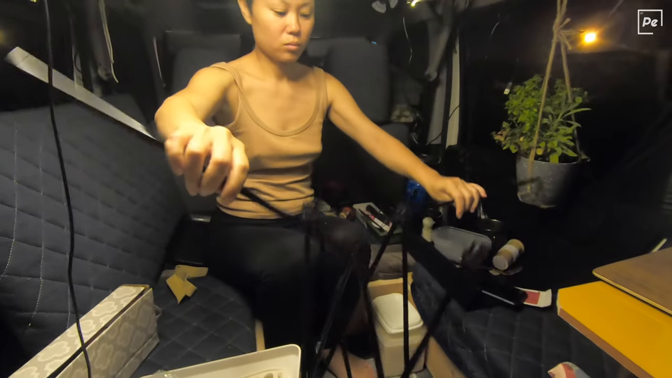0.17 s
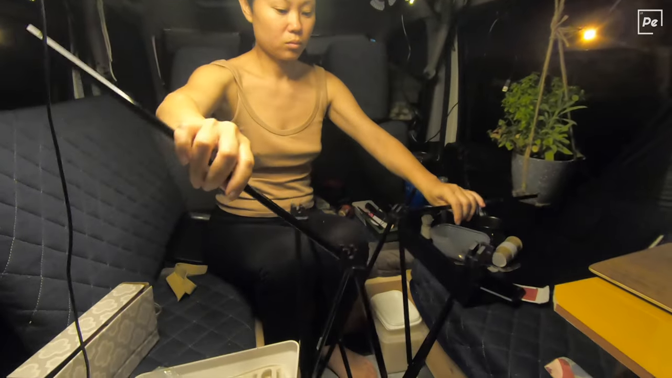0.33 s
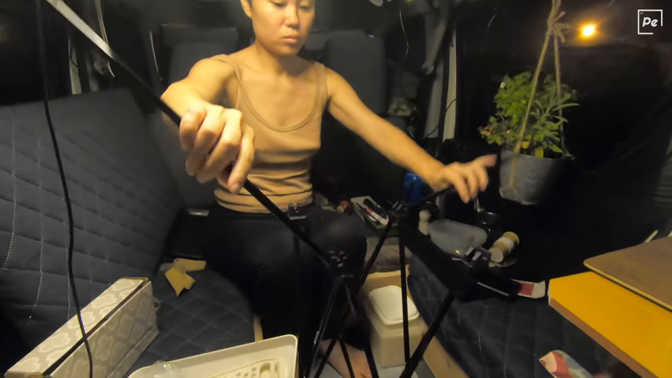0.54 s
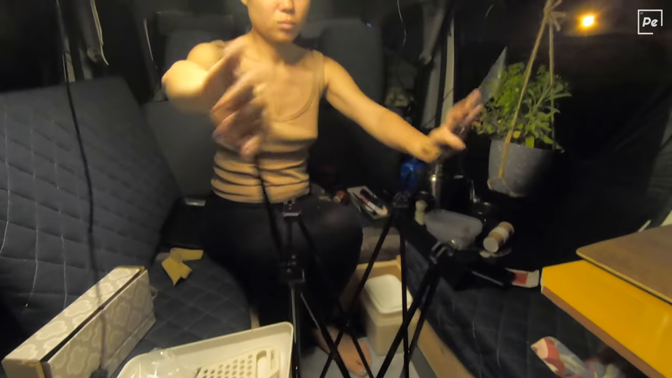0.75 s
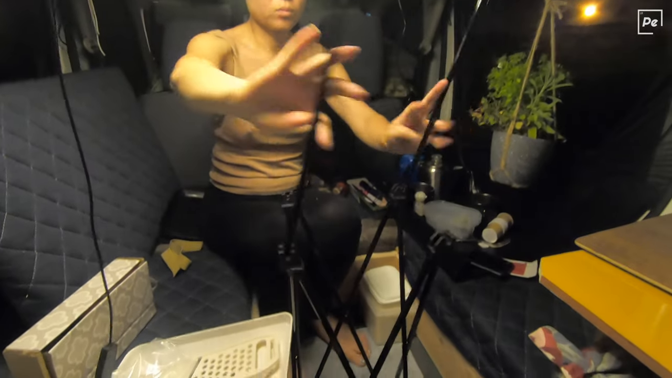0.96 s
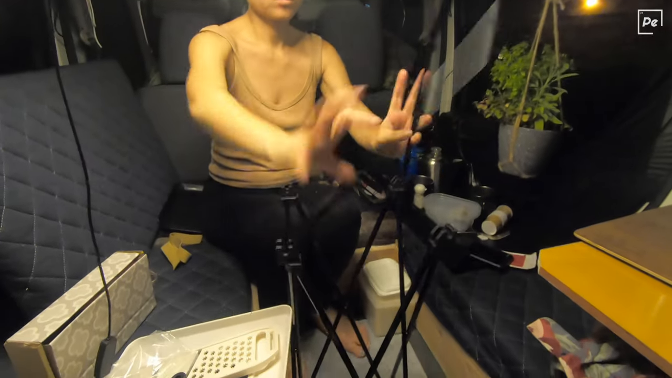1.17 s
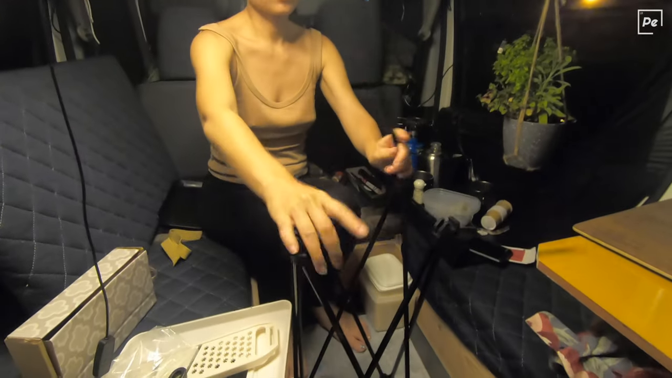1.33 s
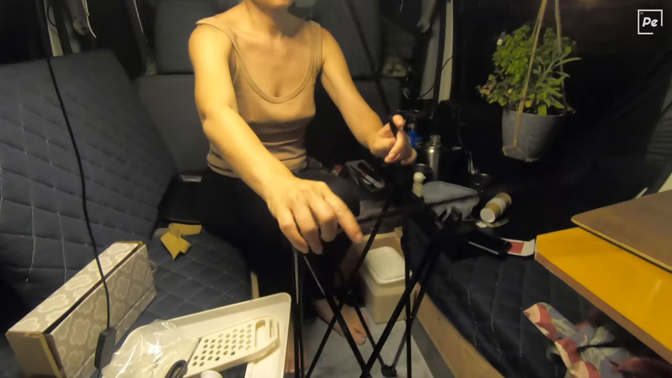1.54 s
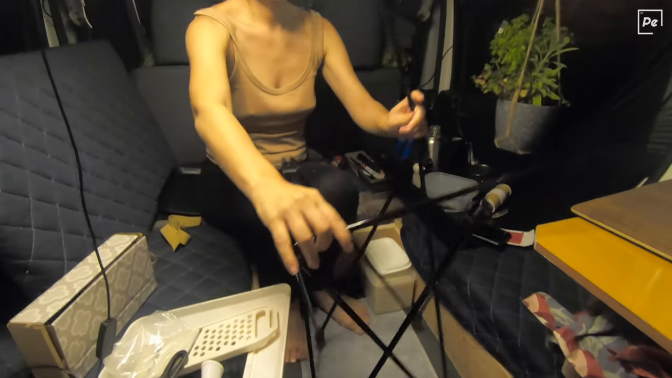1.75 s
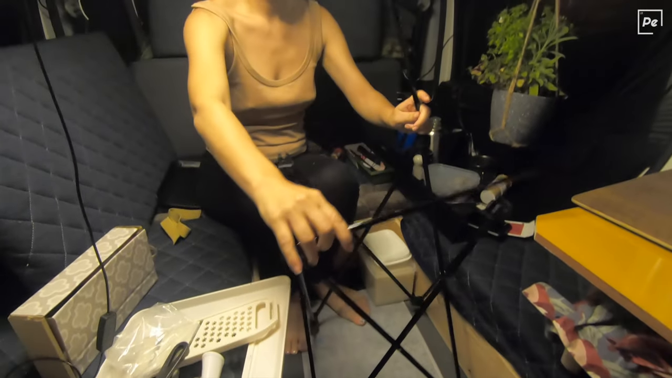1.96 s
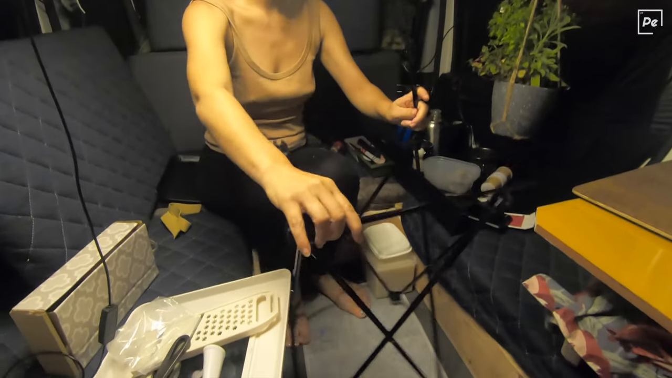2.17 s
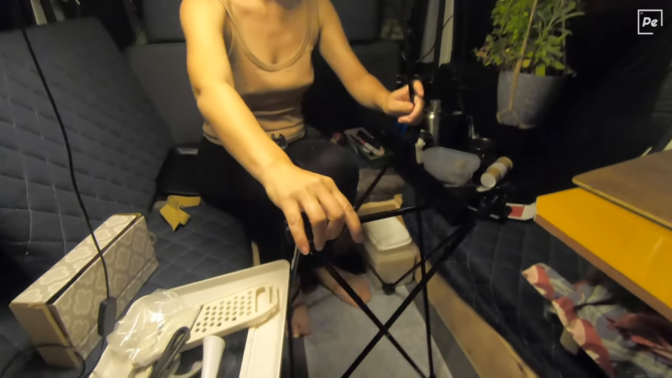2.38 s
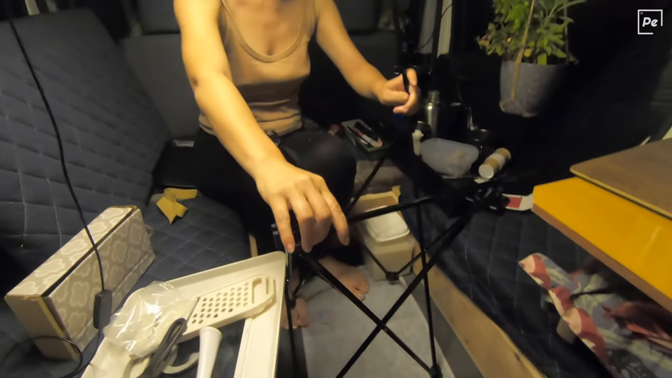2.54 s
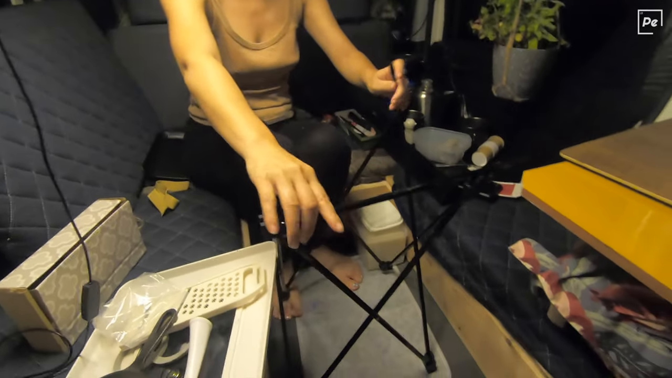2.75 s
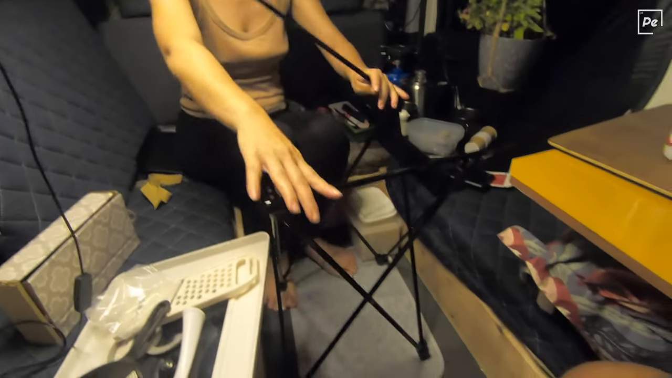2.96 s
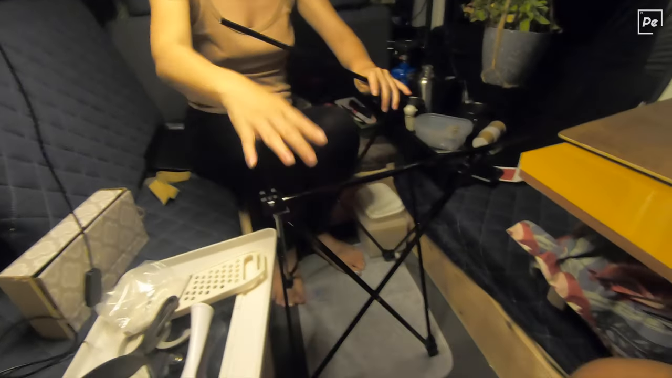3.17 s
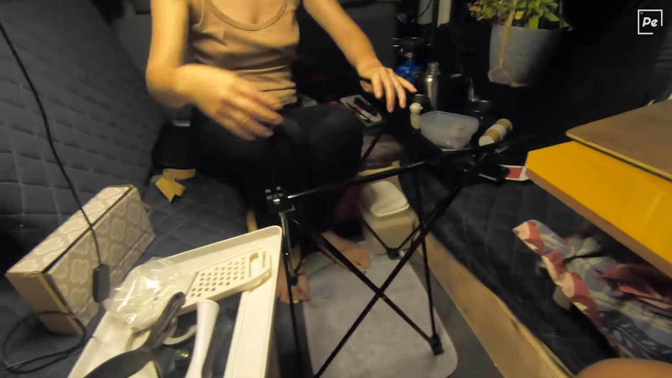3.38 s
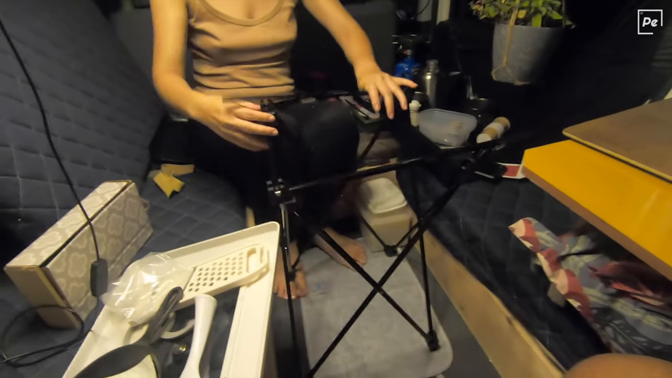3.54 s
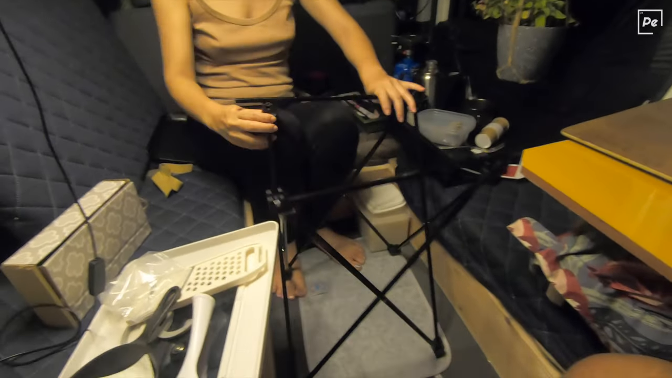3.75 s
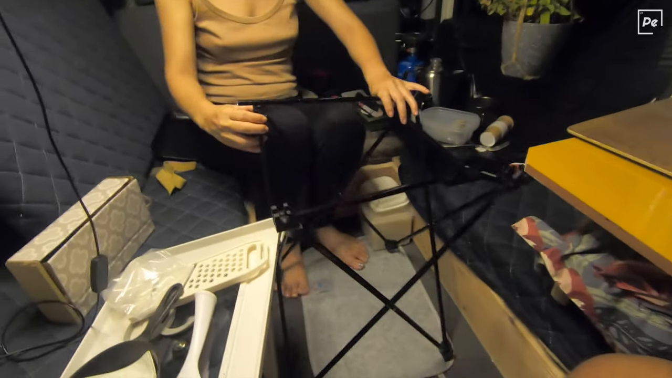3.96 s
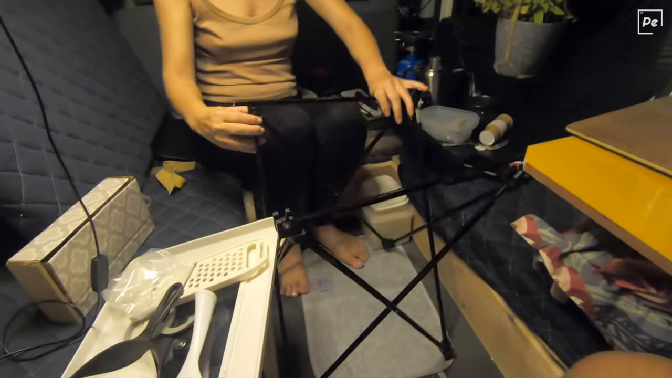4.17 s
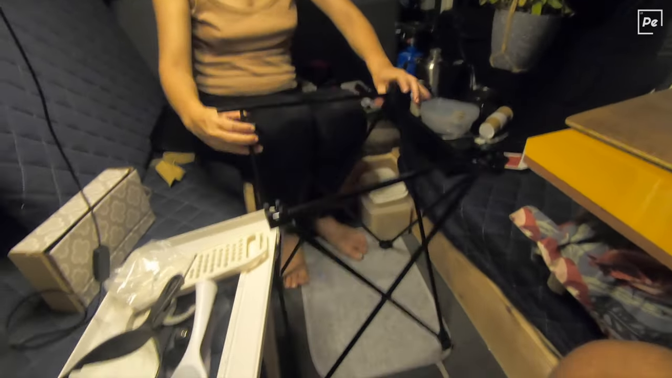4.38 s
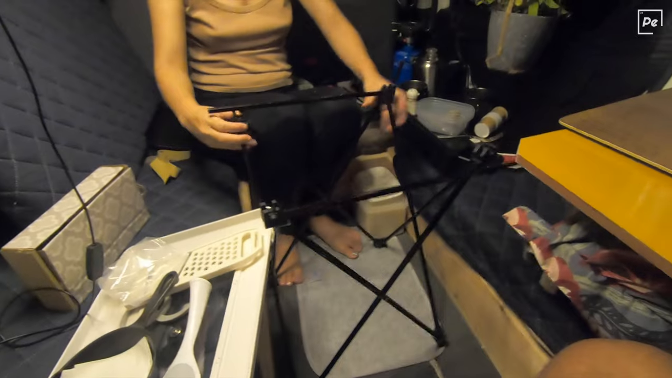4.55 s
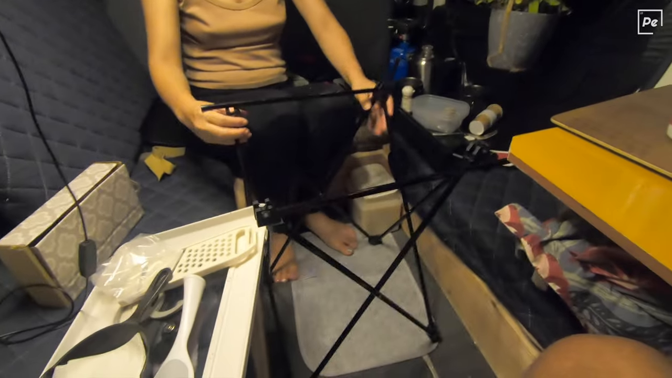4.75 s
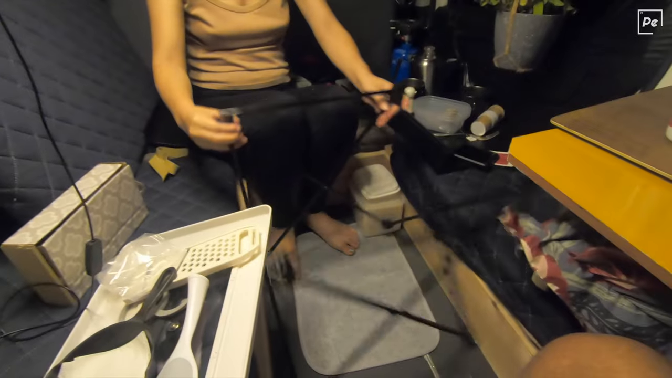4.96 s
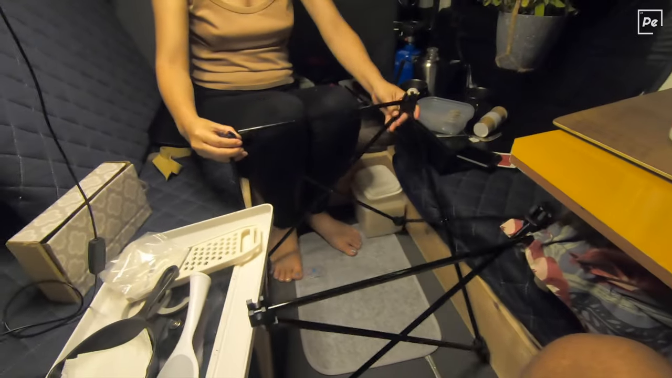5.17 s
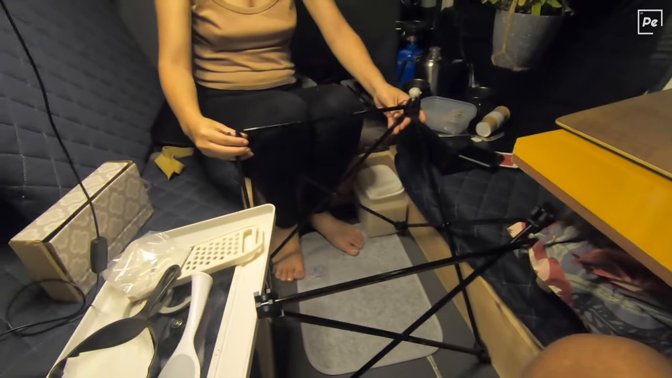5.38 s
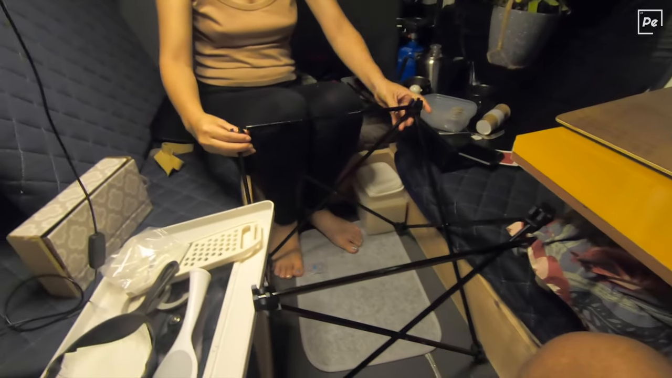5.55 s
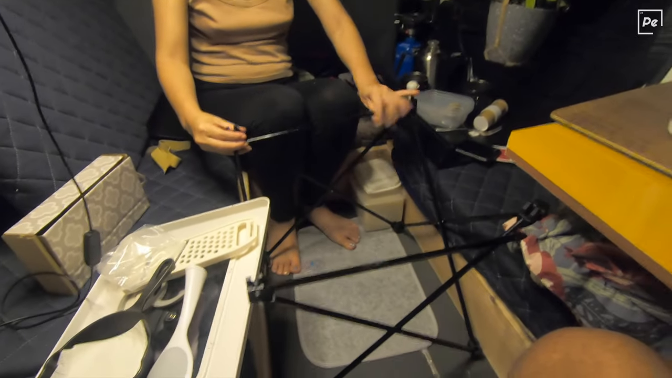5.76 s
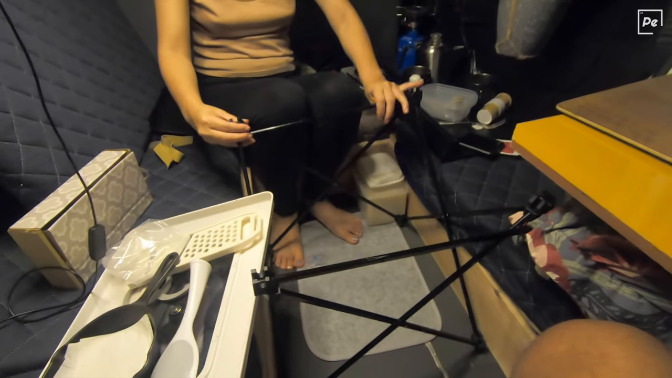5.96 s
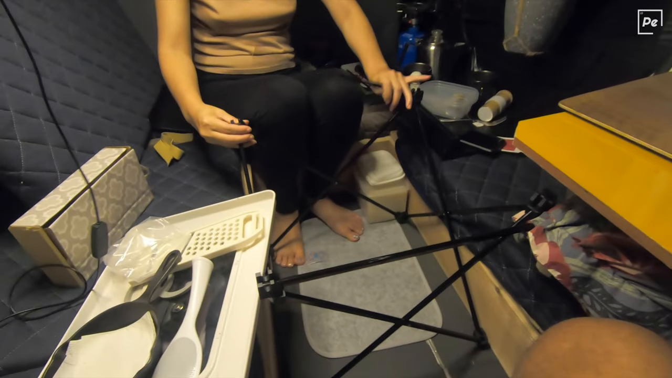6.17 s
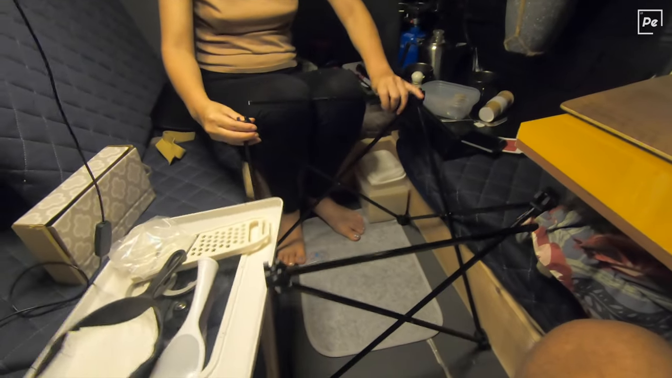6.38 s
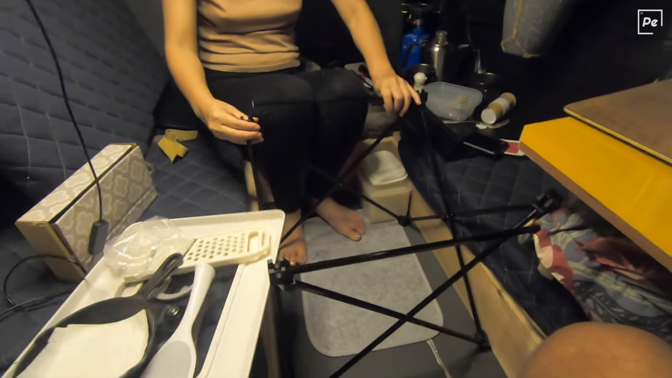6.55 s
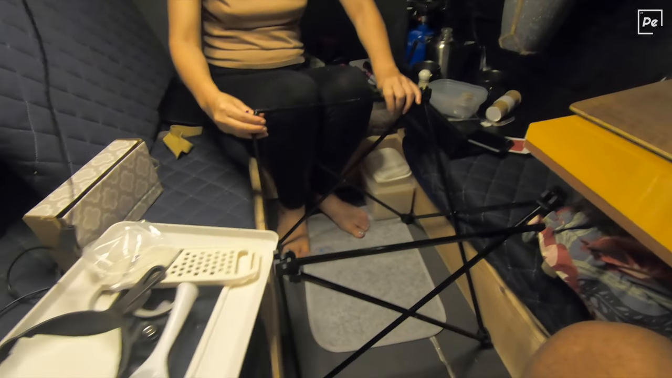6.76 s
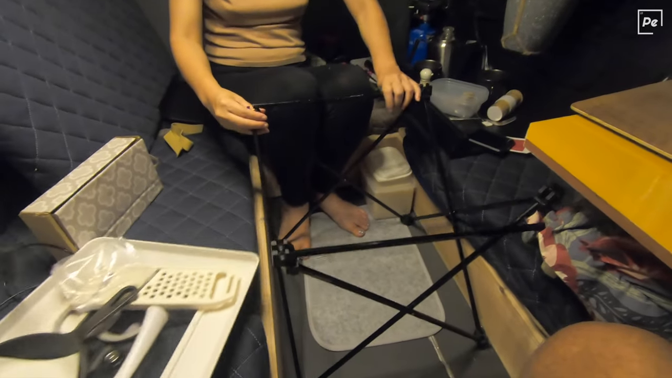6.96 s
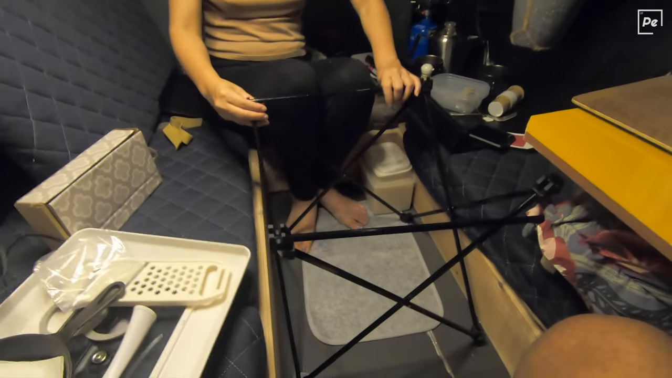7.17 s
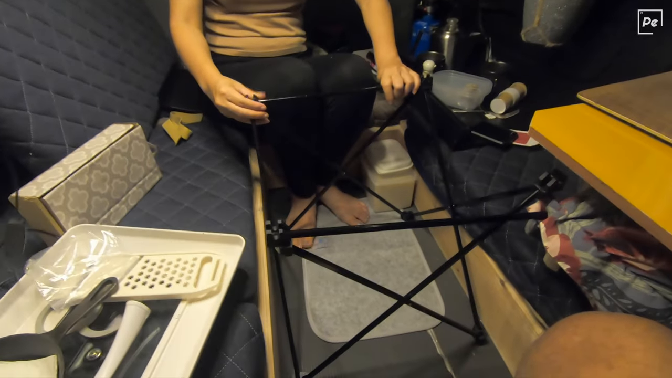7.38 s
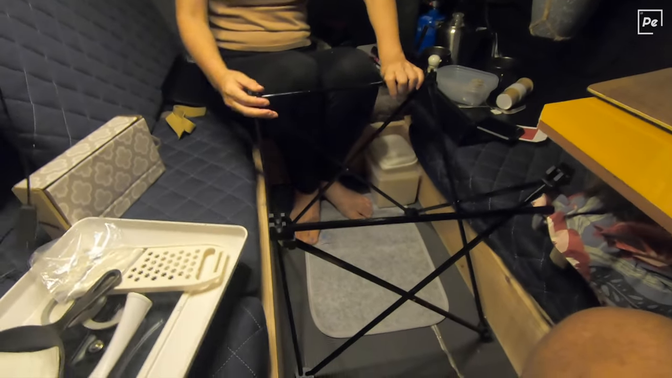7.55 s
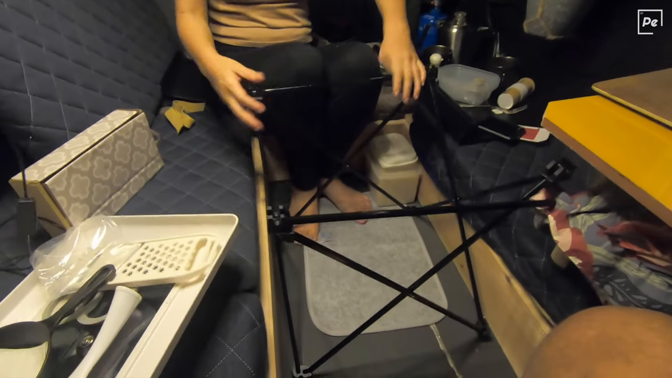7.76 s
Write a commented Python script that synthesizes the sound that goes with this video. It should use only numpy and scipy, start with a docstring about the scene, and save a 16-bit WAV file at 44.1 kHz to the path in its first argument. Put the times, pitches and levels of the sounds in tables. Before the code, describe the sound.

Metal tubes scrape and clack as a collapsible frame unfolds close by, one blow ringing briefly, with floor thumps and faint low rumble.

```python
"""A short scrape of metal runs into hard clacks over a faint hiss and rumble: a folding table frame of
thin tubes is opened inside a small padded van, near a two-port microphone.
Scrapes and chatter are shaped noise; knocked tubes ring as sine pings and resonances.
Feet and knees thump the floor, and one blow clanks a sheet panel.
Short noise reflections are the cabin's answer to the metal frame."""
import sys
import numpy as np
from scipy import signal
from scipy.fft import rfft, irfft
from scipy.io import wavfile
from scipy.ndimage import uniform_filter1d

SR = 44100
rng = np.random.default_rng(int(sys.argv[2]) if len(sys.argv) > 2 else 0)


def wav_record(signal):
    """Record a signal, one row per channel, as 16-bit PCM in the file named by sys.argv[1]."""
    frames = np.transpose(np.atleast_2d(signal))
    bounded = np.clip(frames, -1, 1)
    # unit amplitude maps onto the largest positive 16-bit level
    quanta = np.round(bounded * 32767).astype(np.int16)
    wavfile.write(sys.argv[1], SR, quanta)


N = 344862  # length in samples


def undb(db):
    """Turn decibels into a gain."""
    return 10 ** (np.asarray(db) / 20)


def unit(x):
    """Scale a sound to an average (rms) level of 1."""
    return x / np.sqrt(np.mean(x ** 2))


def band(x, lo_hz, hi_hz, order=2):
    """Keep only the pitches between two edges (Butterworth band-pass)."""
    return signal.sosfilt(signal.butter(order, [lo_hz, hi_hz], "band", fs=SR, output="sos"), x)


def mode(x, hz, t60):
    """Ring at one pitch: a unit click gives a tone of amplitude 1 that falls 60 dB in t60 seconds."""
    r = np.exp(-np.log(1000) / (t60 * SR))
    w = 2 * np.pi * hz / SR
    return signal.lfilter([0, r * np.sin(w)], [1, -2 * r * np.cos(w), r * r], x)


def walk(rate):
    """Wander at random, with `rate` new levels per second, smoothed; the spread is near 1."""
    k = max(int(SR / rate), 1)
    held = np.repeat(rng.standard_normal(N // k + 1), k)
    return 1.2 * uniform_filter1d(held, k)[:N]


def add(out, s, piece):
    """Mix a piece in at time s (seconds)."""
    i = int(s * SR)
    out[..., i:i + piece.shape[-1]] += piece[..., :N - i]


def sides(pan_db):
    """Give the gains at the left and right port for a left-minus-right difference in dB."""
    return undb(np.array([[pan_db], [-pan_db]]) / 2)


# The colour of the hiss. Each row: frequency in Hz, relative level in dB per Hz.
HISS_COLOUR = [(41, -40), (70, -20), (112, -18), (146, -4.5), (286, -5.5), (417, -12.5), (1460, -22.5),
               (2130, -26), (3550, -32), (5680, -27), (14500, -47.5)]
HISS_DB = -73.5


def hiss():
    """Faint air and street noise, alike left and right in the bass, drifting a little."""
    hz = np.maximum(np.arange(N // 2 + 1) * SR / N, 1)
    points_hz, points_db = np.transpose(HISS_COLOUR)
    colour = undb(np.interp(np.log(hz), np.log(points_hz), points_db))
    mid, side = rfft(rng.standard_normal((2, N)))
    apart = np.clip(hz / 900, .15, .9)
    noise = irfft(colour * np.array([mid + apart * side, mid - apart * side]), N)
    level = undb(HISS_DB + 3.0 * walk(3))
    return level * noise / np.sqrt(np.mean(noise.mean(0) ** 2))


# How strongly the van body sways. Each row: time in seconds, middle level in dB.
SWAY = [(0, -62.5), (.2, -52.5), (.6, -63.5), (.9, -59), (1.301, -67), (1.452, -42), (1.699, -66),
        (3.502, -65.5), (4.299, -59), (5.101, -77.5), (5.501, -76), (7.15, -67.5), (7.3, -62.5),
        (7.8, -88.5)]


def rumble():
    """The van body wobbles: very low noise whose level follows a curve and wanders around it."""
    mid, side = band(rng.standard_normal((2, N)), 21, 42, order=3)
    s, db = np.transpose(SWAY)
    level = undb(np.interp(np.arange(N) / SR, s, db) + 8.6 * walk(6))
    return level * (unit(mid) + 0.55 * unit(side) * np.array([[1], [-1]]))


def contacts(uneven_db, rate, apart, lag_s):
    """Metal touching metal: uneven noise, part shared but late at the right port, part each port's own."""
    shared = rng.standard_normal(N)
    late = np.roll(shared, int(lag_s * SR))
    ports = np.array([shared, late]) + apart * rng.standard_normal((2, N))
    return unit(undb(uneven_db * walk(rate)) * ports)


def patchy(x, depth_db, rate):
    """As the tubes move, narrow resonant patches of the noise swell and sink on their own."""
    hz = 500 * 2 ** (np.arange(40) / 8)  # eight patches per octave
    return unit(sum(undb(depth_db * walk(rate)) * band(x, f / 1.035, f * 1.035, order=1) for f in hz))


# Short slides of a tube through a joint. Each row: loudest moment in seconds, relative level in dB,
# rise in seconds, fall in seconds, low band against that level in dB, treble against that level in dB.
SLIDES = [(0.021, -44.5, 0.13, 0.066, -9.5, -1), (0.66, -68.5, 0.17, 0.064, -2, -4.5),
          (0.72, -47.5, 0.061, 0.035, -6.5, -20.5), (0.849, -64, 0.089, 0.054, -3.5, -8),
          (1.72, -74, 0.058, 0.081, 3.5, 1), (2.447, -69.5, 0.14, 0.15, 0.5, -10.5),
          (3.801, -60.5, 0.043, 0.092, 12, -24.5), (4.288, -49, 0.054, 0.041, -4.5, -17),
          (4.44, -64.5, 0.15, 0.026, 0.5, -6), (4.892, -50, 0.063, 0.085, -6, -10),
          (5.075, -29, 0.027, 0.033, -7.5, -15.5), (5.2, -64.5, 0.026, 0.092, 2, -10),
          (6.14, -56.5, 0.072, 0.04, -3, -10), (6.588, -50, 0.074, 0.026, -4, -20)]
SLIDE_FADE_DB = 24.5  # drop one rise time before the loudest moment, or one fall time after it
# The last tube, drawn slowly through the fingers. Each row: time in seconds, relative level in dB.
DRAW = [(6.3, -52), (6.38, -49), (6.43, -57.5), (6.54, -53), (6.6, -53), (6.62, -59), (6.85, -58.5),
        (7.07, -56), (7.14, -67), (7.22, -67), (7.29, -63.5), (7.38, -62.5), (7.441, -82), (7.6, -64.5),
        (7.82, -59.5)]
DRAW_BODY_DB, DRAW_TREBLE_DB = -2, -12  # low band and treble against the level, when it is -55 dB
DULLER_DB_PER_DB = 0.34  # pressed harder, the rasp gains body and loses treble


def slide_force(low, high, fidget):
    """How hard rubbing drives one band: short slides swell and fade, the draw follows its curve, hands fidget."""
    t = np.arange(0, N, 32) / SR
    s, db = np.transpose(DRAW)
    duller_db = DULLER_DB_PER_DB * (db + 55)
    draw_db = db + low * (DRAW_BODY_DB + duller_db) + high * (DRAW_TREBLE_DB - duller_db)
    force = undb(np.interp(t, s, draw_db, left=-200))
    for s, db, rise_s, fall_s, body_db, treble_db in SLIDES:
        away = np.maximum((s - t) / rise_s, (t - s) / fall_s)
        force = force + undb(db + low * body_db + high * treble_db - SLIDE_FADE_DB * away ** 2)
    return np.interp(np.arange(N) / SR, t, force) + fidget * undb(-6 * high)


# Joints and tubes knocking. Each row: start in seconds, relative level in dB, low band against that level
# in dB, treble against that level in dB, basic chatter time to fall 60 dB in seconds,
# pitch of the struck part in Hz, left minus right in dB.
CLACKS = [(0.0974, -18, -6, -9.5, 0.11, 2960, 1), (0.182, -19.5, -4, -7, 0.1, 2700, -0.2),
          (0.248, -31.5, -0.5, -16, 0.079, 2490, 1), (0.277, -32, -0.5, -17.5, 0.041, 2440, 0.5),
          (0.378, -39, -1, -18.5, 0.066, 1694, 0.5), (1.074, -31, -4, -7, 0.062, 3160, 0.5),
          (1.27, -53, -3, -1.5, 0.84, 6150, -1.5), (1.316, -17, -3, -10, 0.014, 2564, -2.5),
          (1.8262, -38, -5.5, 2.5, 0.022, 1580, -1), (2.114, -53, -10, -4.5, 0.04, 2700, 0),
          (2.169, -41.5, -4, -3.5, 0.026, 2960, -1.5), (2.2004, -24.5, -5, -4.5, 0.039, 2510, 0),
          (2.2597, -32, -9, 2.5, 0.017, 2460, 0.5), (2.3186, -37.5, -4, -13, 0.078, 2690, 0.5),
          (2.7148, -59, 15.5, -22.5, 0.073, 1610, 0.5), (2.7682, -50.5, 4, -1.5, 0.041, 1610, 4.5),
          (3.5401, -39.5, -4.5, -5, 0.027, 1830, -1.5), (3.6264, -56, -0.5, 5.5, 0.086, 5800, 0),
          (3.675, -56.5, -2, 11.5, 0.02, 7760, 1), (3.769, -42, 2.5, -32, 0.12, 1330, -2.5),
          (3.8643, -22, -2.5, -9.5, 0.079, 2590, 0.5), (4.2627, -44.5, -2, -17, 0.08, 1586, 2),
          (4.404, -36.5, -11, -11, 0.017, 2800, 5), (4.414, -47.5, 8, -12, 0.011, 2330, -9),
          (4.4731, -42.5, -5, -5, 0.013, 1570, 2), (4.8488, -39.5, 1, -24, 0.043, 1710, -2),
          (4.907, -28, 0.5, -6, 0.028, 920, -0.5), (4.934, -38.5, -14, 7.5, 0.097, 5100, 0),
          (4.9883, -24.5, 9, 0, 0.018, 940, -1), (5.028, -34.5, -25.5, 8, 0.081, 2880.0, -2),
          (5.0446, -21.5, -2, -4, 0.071, 3680, 0), (5.1352, -32.5, -2.5, -30, 0.054, 1510, 0.5),
          (5.489, -46.5, -12, 1, 0.023, 3370, -1), (5.6122, -33, -12, 15, 0.03, 7700, 1.5),
          (5.694, -47.5, -6, 15.5, 0.029, 8050, 1.5), (5.7224, -47.5, -7.5, 14, 0.027, 7730, -2),
          (5.744, -42.5, -8, 0, 0.023, 3800, 1), (5.7856, -49.5, -16, 7, 0.029, 7800, 0),
          (5.9813, -61, 5, -23, 0.1, 1496, 0.5), (6.083, -53.5, 3.5, -22, 0.028, 920, -2),
          (6.2913, -26.5, -7, -12, 0.044, 1110, 0.5), (6.8591, -37.5, -15, -5, 0.026, 2140, 0),
          (6.8761, -36, -10, -5, 0.078, 3370, -0.5), (7.2462, -50, -3, -9, 0.25, 2170, 1),
          (7.5913, -49, -18.5, -23, 0.065, 1940, 0.3), (7.7098, -43, -4, -6.5, 0.061, 4520, 2),
          (7.7846, -44, 2, -38.5, 0.079, 2164, 0.5), (7.805, -40.5, -2.5, -17.5, 0.093, 1457, 8)]


def clack_force(low, high, share):
    """How hard knocks drive one band: a quick rise, a hold that is longer for harder knocks, and a decay."""
    force, t = np.zeros((2, N)), np.arange(SR // 8) / SR
    rise = 1 - np.exp(-t / 0.0012)
    for s, peak_db, body_db, treble_db, t60, _, pan_db in CLACKS:
        hold_s = 0.0081 * undb((peak_db + 16.5) / 2)
        fade = np.exp(-np.log(1000) * np.maximum(t - hold_s, 0) / (t60 * share))
        level = undb(peak_db + low * body_db + high * treble_db)
        add(force, s, level * sides(pan_db) * (rise * fade))
    return force


# Bands of contact noise. Each row: low edge in Hz, high edge in Hz, gain in dB,
# multiplier of the basic chatter time.
BANDS = [(717, 1680, -3, 1.22), (1750, 2900, -1.5, 0.8), (2970, 4650, -3, 1.29), (4740, 8120, 1.5, 1.1),
         (9810, 12000, -11.5, 0.6)]
# How far each band follows the tables' tone columns. Each row: share of the low-band dB, share of the treble dB.
FOLLOW = [(1, 0), (0, 0), (0, .35), (0, 1), (0, 1)]
# Ringing of the tube frame. Each row: pitch in Hz, relative level in dB, time to fall 60 dB in seconds.
FRAME_MODES = [(845, -15, 0.05), (1060, -11, .05), (1262, -10, .06), (1570, -11, .05), (2670, -11, .1)]
FIDGET_DB = -81  # relative level of hands shifting on the tubes throughout
PORT_LAG_S = .00022  # the sliding tubes are nearer the left port


def frame():
    """Chatter and rasp, heard directly and through the ringing tubes, which rubbing wakes more."""
    chatter = patchy(contacts(uneven_db=2.8, rate=320, apart=0.8, lag_s=.00003), depth_db=4, rate=25)
    rasp = patchy(contacts(uneven_db=2.0, rate=220, apart=1.0, lag_s=PORT_LAG_S), depth_db=4.5, rate=14)
    knock_ring_db, rub_ring_db = -35, -27
    out, fidget = 0, undb(FIDGET_DB + 5 * walk(6.5))
    for (lo_hz, hi_hz, db, share), (low, high) in zip(BANDS, FOLLOW):
        knocking = clack_force(low, high, share) * chatter
        rubbing = undb(2.0) * slide_force(low, high, fidget) * rasp
        # a narrow band keeps less of the noise, so it is raised to match a wide one
        gain = undb(db) * np.sqrt(SR / 4 / (hi_hz - lo_hz))
        knock, rub = gain * band(np.array([knocking, rubbing]), lo_hz, hi_hz, order=3)
        out = out + knock + rub
        drive = undb(knock_ring_db) * knock + undb(rub_ring_db) * rub
        for hz, mode_db, t60 in FRAME_MODES:
            if lo_hz <= hz < hi_hz:
                out = out + undb(mode_db) * mode(drive, hz, t60)
    return out


def struck_parts(ring_db=-6, cycles=110):
    """Each clack also pings the part that was hit: its pitch and two nearby, beating neighbours."""
    out, t = np.zeros((2, N)), np.arange(SR // 8) / SR
    chances = rng.random((len(CLACKS), 3, 3))
    for (s, peak_db, body_db, treble_db, t60, hz, pan_db), chance in zip(CLACKS, chances):
        band_db = np.interp(np.log(hz), np.log([1000, 2700, 7000]), [body_db, 0, treble_db])
        fade = (1 - np.exp(-t / 0.00053)) * np.exp(-np.log(1000) * t / min(cycles / hz, t60))
        detune = 1 + 0.19 * (chance[:, :1] - .5) * [[0], [1], [1]]
        phase = chance[:, 1:, None]  # its own for each tone and port
        ping = np.sin(2 * np.pi * ((hz * detune * t)[:, None] + phase)).sum(0)
        add(out, s, undb(peak_db + band_db + ring_db) * sides(pan_db) * fade * ping)
    return out


CABIN_T60_S, CABIN_DB = 0.16, -8.5  # time for the duller part to fall 60 dB, reflection level


def cabin(x):
    """Dense short reflections, unrelated at the two ports; the padding eats the treble first."""
    t = np.arange(SR // 3) / SR
    noise = rng.standard_normal((2, len(t)))
    dull = signal.lfilter([.3], [1, -.7], noise)
    fade = np.log(1000) * t / CABIN_T60_S
    tail = dull * np.exp(-fade) + (noise - dull) * np.exp(-1.8 * fade)
    tail = band(tail * (t > .002), 350, 12000, order=1)
    tail = tail / np.sqrt(np.sum(tail ** 2, 1, keepdims=True))
    return undb(CABIN_DB) * signal.fftconvolve(x, tail, axes=1)[:, :N]


# Feet and knees bumping the floor, plus the low body of two hard knocks (the rows near 500 Hz at 5.05 s). Each
# row: start in seconds, level in dB, pitch in Hz.
THUMPS = [(0.097, -31, 279), (0.186, -33.5, 53.5), (0.191, -34, 414), (0.274, -45, 292), (0.708, -51, 290),
          (1.133, -55.5, 285), (2.216, -51, 57), (2.768, -51.5, 87.3), (3.863, -46, 189),
          (4.112, -47.5, 59.7), (4.183, -37.5, 73), (4.207, -50.5, 79.2), (4.241, -54, 58),
          (4.284, -41.5, 51), (4.404, -41, 73), (4.477, -42.5, 50.5), (4.905, -39.5, 276),
          (4.964, -35, 326), (4.994, -29.5, 141), (5.052, -35, 90), (5.052, -39, 500), (5.076, -32.5, 518),
          (5.118, -38.5, 286), (5.443, -51, 375), (5.635, -38.5, 308.5), (5.777, -53, 293),
          (6.142, -45, 321), (6.513, -54, 259), (6.88, -43, 243)]


def thumps(cycles=30, longest_s=0.19):
    """Each bump is a soft push that rings the floor near one pitch, with rough noise around it."""
    out, t = np.zeros((2, N)), np.arange(SR // 2) / SR
    noises = rng.standard_normal((len(THUMPS), 3, len(t)))
    for (s, db, hz), noise in zip(THUMPS, noises):
        push = (1 - np.exp(-t * hz / 0.1)) ** 2
        fade = push * np.exp(-np.log(1000) * t / min(cycles / hz, longest_s))
        rough = unit(band(noise[0] + 0.3 * noise[1:], 0.85 * hz, 1.2 * hz))
        add(out, s, undb(db) * fade * (np.sin(2 * np.pi * hz * t) + 1.0 * rough))
    return out


# Knocks after which one free leg rings on. Each row: start in seconds, level in dB.
LEG_RINGS = [(0.28, -59), (5.102, -50.5)]
LEG_HZ, LEG_T60_S = 1276, .55  # pitch, time to fall 60 dB


def leg():
    """A thin lingering tone from the free leg, one resonance set off by clicks."""
    blows = np.zeros(N)
    for s, db in LEG_RINGS:
        add(blows, s, undb([db]))
    return mode(blows, LEG_HZ, LEG_T60_S)


# The clanked panel. Each row: pitch in Hz, relative level in dB, time to fall 60 dB in seconds.
PANEL_MODES = [(90, -6.5, 0.27), (130, -7, 0.3), (284, -17, 0.2), (550, -31, 0.7), (627, -35, 1.7),
               (759, -29, 0.55), (1206, -27, 0.85), (1325, -30, 1.1), (1373, -26, 0.4), (1427, -29, .4),
               (1814, -32, .36), (2132, -38, .5), (2412, -41, 0.9)]
CLANK_S, CLANK_DB = 1.322, -14.5  # moment and strength of the blow


def clank():
    """One hard blow rings wavering panel modes; many weak ones blur into noise and the floor booms."""
    blow = np.zeros(N)
    blow[int(CLANK_S * SR)] = undb(CLANK_DB)
    out = np.zeros((2, N))
    for k, (hz, db, t60) in enumerate(PANEL_MODES):
        # neighbouring modes start in opposite directions
        out += (-1) ** k * undb(db + 2.5 * walk(12)) * mode(blow, hz, t60)
    t = np.arange(SR) / SR
    left, right, low = rng.standard_normal((3, SR))
    ports = np.array([left, right])
    blur = unit(band(ports, 310, 2600)) * np.exp(-np.log(1000) * t / .65)
    boom = unit(band(low + 0.37 * ports, 55, 300)) * np.exp(-np.log(1000) * t / 0.58)
    boom = boom * (1 - np.exp(-t / 0.0039))  # soft start
    add(out, CLANK_S, undb(CLANK_DB - 28.5) * blur + undb(CLANK_DB - 19.0) * boom)
    return out


# Tones of a cross brace. Each row: pitch in Hz, relative level in dB, time to fall 60 dB in seconds.
BRACE_MODES = [(960, 2, .08), (2590, -3, .15), (2665, -1, .15), (4823, -7, .33)]
# Knocks that reach the brace. Each row: start in seconds, strength in dB.
BRACE_RINGS = [(2.2, -39.5), (2.259, -54), (2.32, -57.5), (3.865, -46), (5.045, -43)]


def brace():
    """The cross brace sings after some knocks: a few clear resonances, two of them close enough to beat."""
    blows = np.zeros(N)
    for s, db in BRACE_RINGS:
        add(blows, s, undb([db]))
    return sum(undb(db) * mode(blows, hz, t60) for hz, db, t60 in BRACE_MODES)


def scene():
    """The metal frame fills the cabin; thumps, clank, hiss and rumble are heard without reflections."""
    metal = frame() + struck_parts() + leg() + brace()
    return metal + cabin(metal) + thumps() + clank() + hiss() + rumble()


def record(dry):
    """The recorder cuts everything above 14700 Hz steeply."""
    return signal.sosfilt(signal.ellip(10, .2, 70, 14700, fs=SR, output="sos"), dry)


dry = scene()
out = record(dry)
wav_record(out)
```